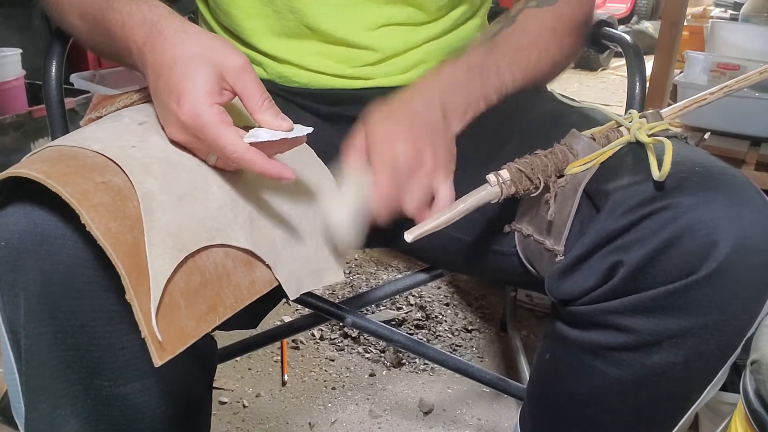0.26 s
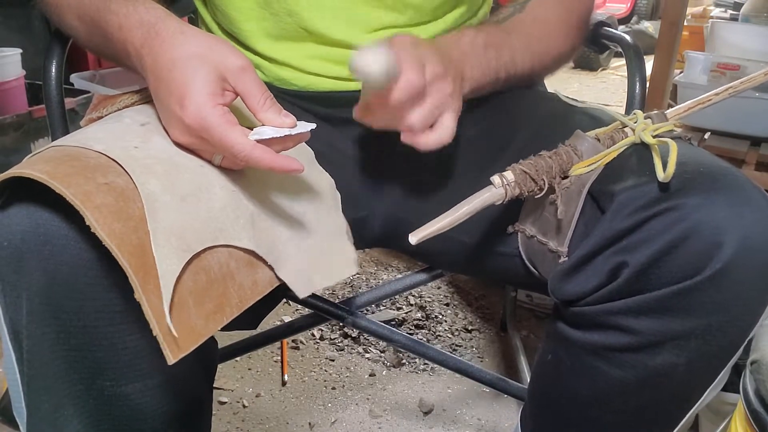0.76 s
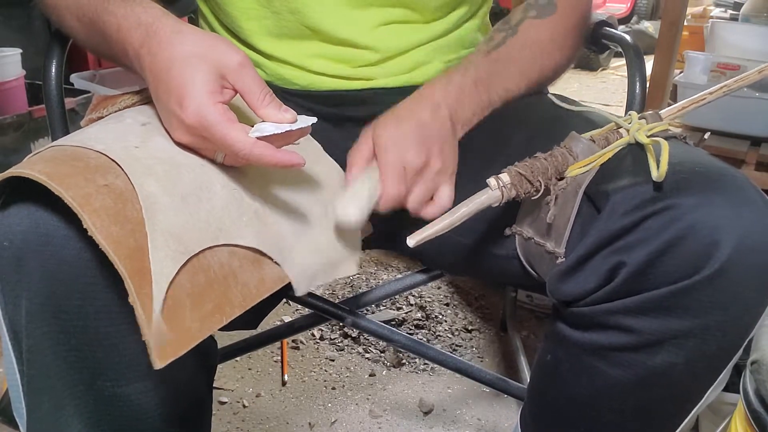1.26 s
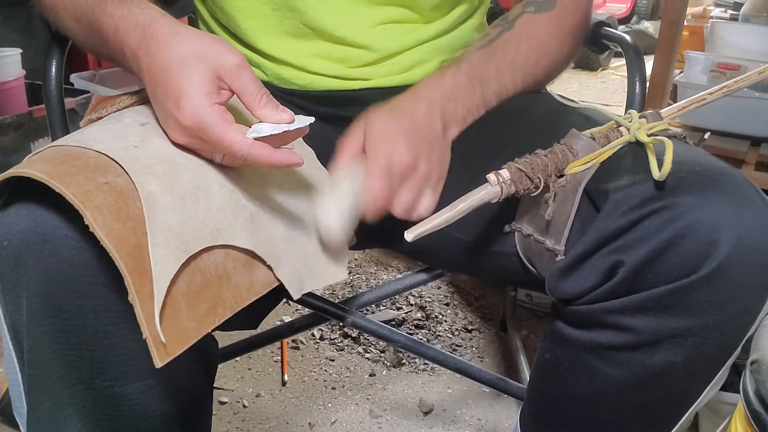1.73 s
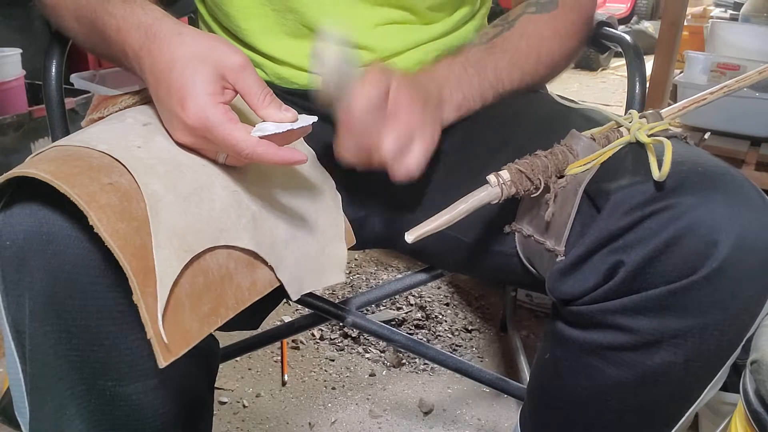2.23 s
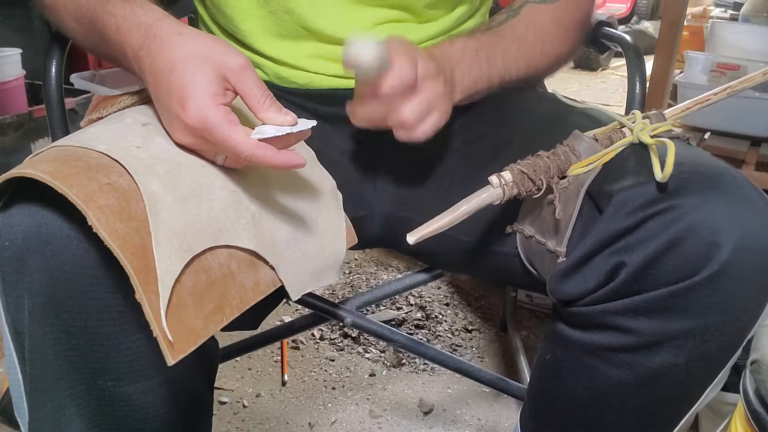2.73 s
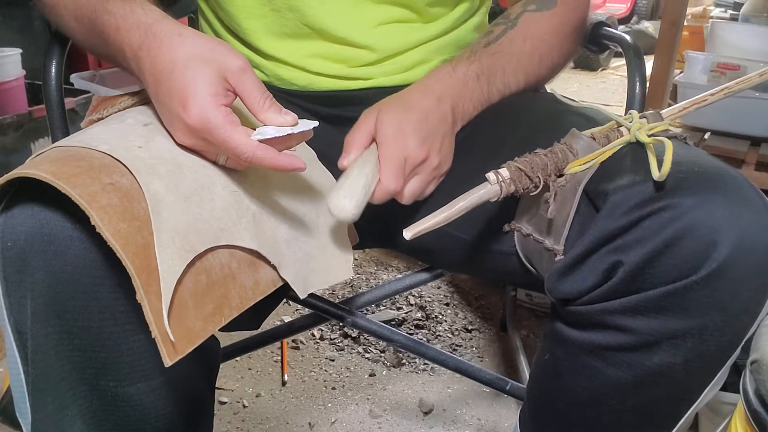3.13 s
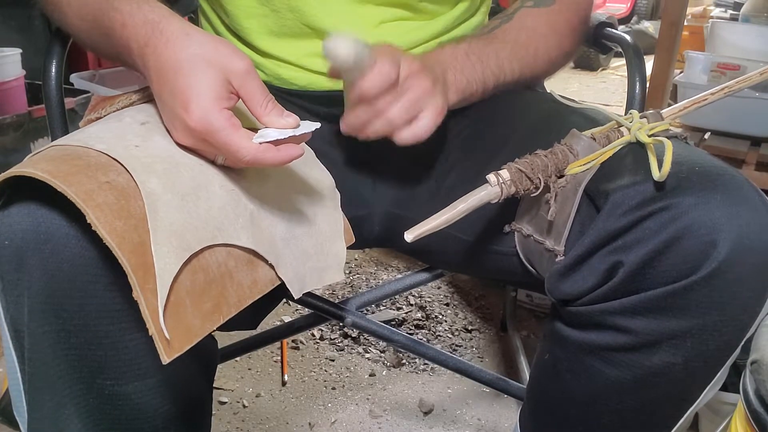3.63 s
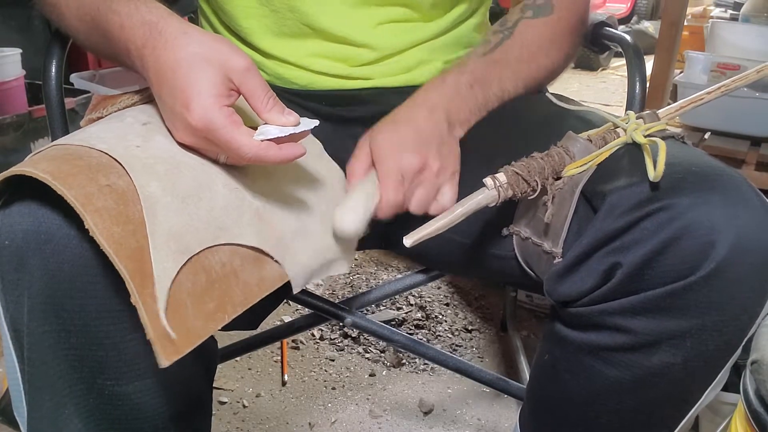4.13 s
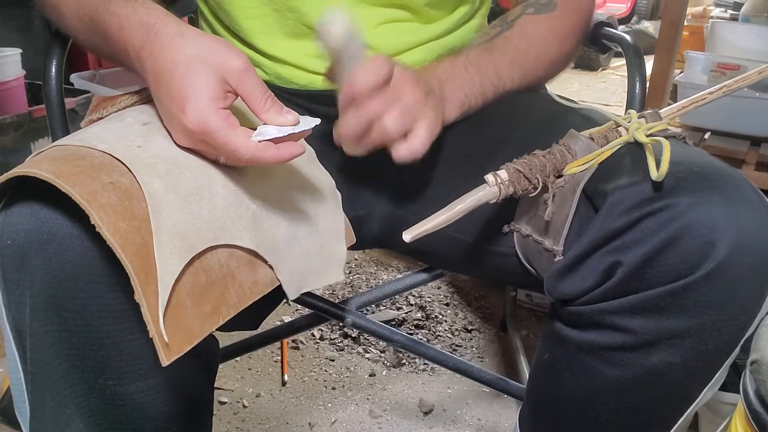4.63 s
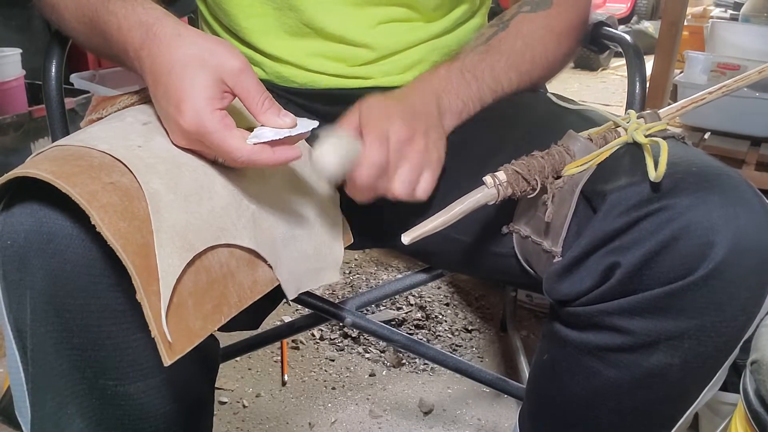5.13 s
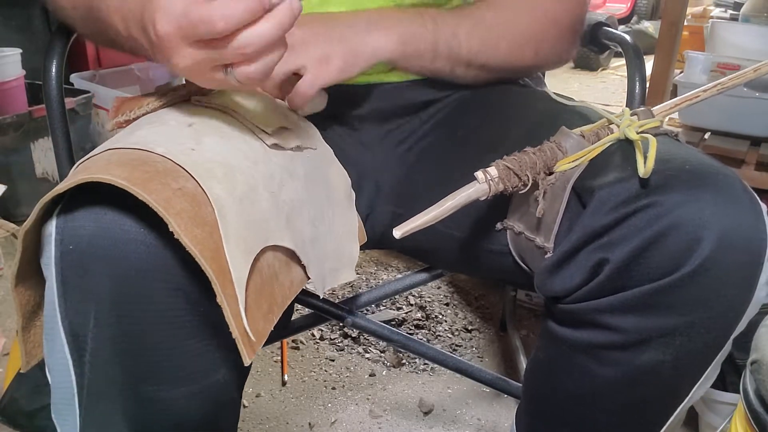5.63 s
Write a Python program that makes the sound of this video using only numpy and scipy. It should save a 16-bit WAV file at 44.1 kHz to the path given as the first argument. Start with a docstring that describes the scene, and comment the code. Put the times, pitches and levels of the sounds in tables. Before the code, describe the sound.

Small stone struck with a handheld hammerstone, heard near and louder at the left. Each hit is a high, short, ringing clack with a gritty contact click, close reflections and a brief room tail. Strikes vary in brightness and force, in two runs split by a pause. Underneath are a steady soft fan and faint low hum. The end is only room tone and a tiny brush of movement.

```python
"""Stone tapped in a workshop

A stone is tapped in mostly even runs, heard by two microphones and stronger at the left one.
Each tap rings three short modes and a contact click; close echoes, scatter and a fading room follow.
Fan noise, mains hum and a low drone fill the pauses; dull thuds and one faint rustle join in."""
import sys
import numpy as np
from scipy import signal
from scipy.fft import rfft, irfft
from scipy.io import wavfile
from scipy.ndimage import uniform_filter1d

SR = 44100
rng = np.random.default_rng(int(sys.argv[2]) if len(sys.argv) > 2 else 0)


def pcm_store(signal):
    """Save signal as 16-bit PCM."""
    levels = np.round(np.clip(np.atleast_2d(signal), -1, 1) * 32767)
    wavfile.write(sys.argv[1], SR, levels.astype(np.int16).T)


N = 258867


def gain_of(db):
    """Decibels to amplitude gain."""
    return 10 ** (np.asarray(db) / 20)


def read(points, hz):
    """Interpolates a table on a log-frequency axis."""
    f, value = np.transpose(points)
    return np.interp(np.log(hz + 1), np.log(f + 1), value)


def ring(x, hz, width_hz):
    """Two-pole resonance with gain 1 at its centre; a wider one dies sooner."""
    radius, turn = np.exp(-np.pi * width_hz / SR), np.exp(2j * np.pi * hz / SR)
    poles = np.poly([radius * turn, radius / turn]).real
    return abs(np.polyval(poles, turn)) * signal.lfilter([1], poles, x)


def band(x, hz, width_hz):
    """Band-pass around hz."""
    edges = [hz - width_hz / 2, min(hz + width_hz / 2, SR / 2 - 1)]
    return signal.sosfilt(signal.butter(2, edges, "band", fs=SR, output="sos"), x)


def peaked(x):
    """Scales to peak 1."""
    return x / abs(x).max()


def slow_noise(shape, smooth_samples):
    """Slow random wander of about unit spread: a moving average of noise."""
    return uniform_filter1d(rng.standard_normal(shape), smooth_samples) * np.sqrt(smooth_samples)


def fan():
    """Steady noise with narrow bumps, partly alike and delayed at the right microphone."""
    # left spectrum: pitch_hz, level_db per Hz
    floor = [(20, -91), (45, -72), (110, -75), (160, -80.5), (400, -80.5), (600, -77.5), (720, -85),
             (1200, -83), (2200, -89.5), (4000, -94.5), (6600, -101), (7500, -111), (9800, -109),
             (10600, -122), (15600, -127), (15900, -150)]
    # bumps: pitch_hz, width_hz, level_db
    bumps = [(116.3, 15.4, -62), (467, 43, -60), (874, 66, -56), (980, 42, -56.5), (1670, 28.6, -93.5),
             (2707, 71, -66), (3780, 250, -65)]
    # level difference: pitch_hz, left_minus_right_db
    left_excess = [(60, 2), (200, 0.5), (380, 3), (700, 5.5), (1290, 5.5), (2380, 6.5), (4400, 9.5),
                   (8100, 12), (10000, 7), (12000, -4.5), (15000, 10.5)]
    # likeness of the two sides: pitch_hz, likeness (0 to 1)
    likeness = [(30, .995), (120, .97), (250, .87), (700, .8), (1000, .92), (2000, .75), (5000, .7),
                (10000, .5), (14000, .1)]
    lag_ms = 0.43
    hz = np.fft.rfftfreq(N, 1 / SR)
    power = gain_of(read(floor, hz)) ** 2
    for f, width_hz, db in bumps:
        power = power + gain_of(db) ** 2 / width_hz * np.exp(-((hz - f) / width_hz * 2) ** 2)
    left, other = rfft(rng.standard_normal((2, N)), axis=1)
    same = np.clip(read(likeness, hz), 0, 1)
    delayed = left * np.exp(-2j * np.pi * hz * lag_ms / 1000)
    right = same * delayed + np.sqrt(1 - same ** 2) * other
    both = np.array([left, right / gain_of(read(left_excess, hz))])
    return irfft(both * np.sqrt(power * SR / 2), N, axis=1)


def hum():
    """Mains overtones: sines whose levels waver slowly."""
    # overtones: pitch_hz, level_db (rms, before the waver)
    overtones = [(240.5, -65), (360.7, -67.5)]
    waver_db = 2.6  # spread
    t = np.arange(N) / SR
    out = np.zeros(N)
    for (hz, db), waver in zip(overtones, slow_noise((len(overtones), N), 3000)):
        out += gain_of(db + waver_db * waver) * np.sin(2 * np.pi * hz * t)
    return np.sqrt(2) * out


def drone():
    """Low sine of changing level whose wavering pitch settles lower, then holds around there."""
    # level curve: time_s, level_db (rms)
    levels = [(0.0, -63), (0.19, -55.5), (0.93, -47), (0.96, -57), (1.99, -53.5), (2.03, -70),
              (2.47, -47.5), (2.73, -62), (2.84, -55), (2.96, -67), (3.02, -59), (3.32, -54), (4.2, -66.5),
              (4.69, -50), (5.77, -63), (5.87, -64)]
    # pitch curve before the waver: time_s, pitch_hz
    pitches = [(0, 65), (.54, 63.8), (.65, 58.6)]
    waver_hz = 0.75  # spread
    t = np.arange(N) / SR
    pitch_hz = np.interp(t, *np.transpose(pitches)) + waver_hz * slow_noise(N, 9000)
    level = gain_of(np.interp(t, *np.transpose(levels)))
    return np.sqrt(2) * level * np.sin(2 * np.pi * np.cumsum(pitch_hz) / SR)


def brushes():
    """Faint rustle: a soft wide-band puff of noise."""
    # puffs: centre_s, gain_db (before panning), length_s (centre to 1/e)
    puffs = [(5.65, -57.5, 0.021)]
    t = np.arange(N) / SR
    noise = band(rng.standard_normal((2, N)), 5400, 6900)
    return noise * sum(gain_of(db) * np.exp(-((t - s) / length_s) ** 2) for s, db, length_s in puffs)


def thuds():
    """Soft dull bumps under and after some taps: a few cycles of a damped low sine."""
    # bumps: start_s, gain_db (before panning), pitch_hz
    bumps = [(.326, -50, 484), (.341, -42, 760), (.35, -38, 930), (.37, -42, 610), (.645, -38.5, 413),
             (1.258, -43, 397), (1.522, -38, 338), (2.6, -39, 600), (2.625, -44, 500), (2.906, -50, 505),
             (3.829, -41, 670), (4.715, -46, 605), (4.948, -44, 614)]
    out, t = np.zeros(N), np.arange(2000) / SR
    envelope = t / 0.0024 * np.exp(1 - t / 0.0021)
    for s, db, hz in bumps:
        start = round(s * SR)
        out[start:start + len(t)] += gain_of(db) * np.sin(2 * np.pi * hz * t) * envelope
    return out


def late_room(noise):
    """Late room sound: noise builds up, then dies band by band; left and right levels set."""
    # decay: pitch_hz, t60_s
    decay = [(1200, 0.23), (3700, 0.28), (6500, 0.31), (9600, 0.23), (14000, 0.27)]
    level_db, build_up_s = (-4.5, -8.5), 0.048
    size = noise.shape[1]
    hz, t, grid = signal.stft(noise, SR, nperseg=128)
    fade = gain_of(-60 * t / read(decay, hz)[:, None])
    tail = signal.istft(grid * fade, SR, nperseg=128)[1][:, :size]
    tail = tail * (1 - np.exp(-np.arange(size) / SR / build_up_s))
    return gain_of(level_db)[:, None] * tail / np.linalg.norm(tail, axis=1, keepdims=True)


def early_scatter(noise):
    """Dense early reflections: decaying noise after a short ramp; left and right levels set."""
    level_db, t60_s, build_up_s = (8.5, -4), 0.1, 0.0018
    t = np.arange(noise.shape[1]) / SR
    scatter = noise * gain_of(-60 * t / t60_s) * np.minimum(t / build_up_s, 1)
    return gain_of(level_db)[:, None] * scatter / np.linalg.norm(scatter, axis=1, keepdims=True)


def close_echoes(size):
    """Echoes off nearby things at exact delays, then weaker ones of chance sign."""
    # left echoes: delay_ms, strength (signed)
    left_echoes = [(0.0, 0.56), (0.658, 1.0), (0.907, 1.0), (1.361, -0.55), (1.837, -0.83), (2.472, -0.67),
                   (3.129, -0.48), (4.036, -0.47), (6.1, 0.55), (6.803, -0.62), (7.664, -0.73)]
    # right echoes: delay_ms, strength (signed)
    right_echoes = [(0.272, -0.24), (0.658, -0.99), (1.905, 0.76), (2.222, 0.38), (3.129, -0.35),
                    (5.351, 0.35), (7.052, -0.24), (8.662, 0.23), (9.569, -0.3)]
    step_ms, later_db = 1.6, (-19, -22)  # levels left, right
    later_ms = np.arange(10.5, 26, step_ms)
    at = np.arange(-20, size - 20)  # room for the sinc to start before delay 0
    sides = []
    for near, db in zip((left_echoes, right_echoes), later_db):
        place, sign = rng.random((2, len(later_ms)))
        far = list(zip(later_ms + step_ms * place, gain_of(db) * np.sign(sign - .5)))
        sides.append(sum(g * np.sinc(at - ms * SR / 1000) for ms, g in near + far))
    return np.array(sides)


def click_part(low_db, high_db, grit_db):
    """The high ring, and the contact itself: a low knock and a crunch in two treble bands."""
    detune = .006  # spread, share of the pitch
    click = signal.unit_impulse(1024)
    high_hz = 9517 * (1 + detune * rng.standard_normal())
    high = band(ring(click, high_hz, 420), high_hz, 4360)
    knock = band(band(click, 1280, 330), 1280, 330)
    # grains break a moment after contact
    grit_lag, edge_lag = rng.integers(8, 40, size=2)
    grit = band(np.roll(click, grit_lag), 6200, 3400)
    edge = band(np.roll(click, edge_lag), 13200, 5600)
    parts = [(low_db - 15.5, knock), (grit_db, grit), (high_db, high), (high_db - 18, edge)]
    return sum(gain_of(db) * part / np.linalg.norm(part) for db, part in parts)


def taps():
    """Strikes ring the stone through fixed echoes, with a scatter and room partly new each time."""
    # strikes: start_s, low_ring_db, middle_ring_db, high_ring_db, grit_db,
    # damping (factor on the low ring's width, from the grip), low_ring_hz
    strikes = [(0.0607, -31, -38, -18.5, -24, 0.98, 3700), (0.1096, -32, -59, -22.5, -38, 0.86, 3670),
               (0.3244, -16, -24.5, -1, -13.5, 1.17, 3770), (0.6442, -7, -33, 3, -22.5, 2.9, 3820),
               (0.6506, -11, -39, -8.5, -8.5, 2.7, 3540), (0.7223, -31, -57, -40, -40, 5.9, 3330),
               (0.9643, -8, -15.5, 3.5, -5, 0.57, 3813), (1.2567, -9.5, -19, -7, -57, 1.8, 3780),
               (1.5204, -8, -63, -9.5, -23, 1.02, 3690), (1.7796, -13, -43, -20, -23.5, 1.7, 3610),
               (2.0324, -9.5, -15, -15.5, -10.5, 0.61, 3730), (2.3056, -8.5, -17, -7, -6.5, 0.56, 3720),
               (2.597, -7.5, -15.5, -12, -28.5, 1.03, 3675), (2.904, -10.5, -15, -2.5, -5.5, 0.39, 3690),
               (3.5727, -20, -28, -26.5, -24.5, 1.36, 3700), (3.8271, -11.5, -17.5, 2.5, -9.5, 1.95, 3680),
               (4.124, -8, -16, -4, -7.5, 0.69, 3720), (4.4215, -8.5, -13, -9.5, -8.5, 0.78, 3666),
               (4.7127, -7, -43.5, -4.5, -19, 0.72, 3667), (4.9471, -13, -39, -13.5, -27, 2.5, 3570),
               (5.1675, -12.5, -19.5, -14.5, -15, 1.34, 3616)]
    moved = 0.53  # amplitude share of scatter and room noise that is new each tap, as the hands move
    low_width_hz, linger_width_hz, linger_db = 260, 150, -9  # low width at damping 1
    middle_hz, middle_width_hz, middle_room_db = 4640, 235, -7.5
    soft_hz = 4540  # the blow is too long to drive the low ring far above its pitch
    treble_t60_s = 0.097  # soft surroundings swallow the treble of later echoes
    treble_room_db, left_minus_right_db = 1.5, -1.14
    size, out, click = SR // 2, np.zeros((2, N + SR)), signal.unit_impulse(1024)
    t = np.arange(size) / SR
    echoes, steady = close_echoes(size), rng.standard_normal((2, size))
    dulled = echoes * gain_of(-60 * t / treble_t60_s)
    blow = signal.sosfilt(signal.butter(2, soft_hz, fs=SR, output="sos"), click)
    middle = peaked(band(ring(click, middle_hz, middle_width_hz), middle_hz, 1200))
    balance = gain_of([[left_minus_right_db / 2], [-left_minus_right_db / 2]])
    for s, low_db, middle_db, high_db, grit_db, damping, low_hz in strikes:
        noise = np.sqrt(1 - moved ** 2) * steady + moved * rng.standard_normal((2, size))
        scatter = early_scatter(noise)
        room = late_room(noise[:, ::-1])
        # a small stone gives no bass
        low = gain_of(low_db) * peaked(band(ring(blow, low_hz, low_width_hz * damping), 4080, 5280))
        # a core of the low ring lasts into the room
        linger = gain_of(low_db + linger_db) / damping * peaked(ring(click, low_hz, linger_width_hz))
        # the click's room share has its own level
        click_path = dulled + gain_of(treble_room_db) * room + scatter
        # the middle mode beams at the microphones, so less of it reaches the room
        middle_path = echoes + gain_of(middle_room_db) * room
        paths = [(low, echoes + room + scatter),
                 (click_part(low_db, high_db, grit_db), click_path),
                 (linger, room),
                 (gain_of(middle_db) * middle, middle_path)]
        heard = sum(signal.fftconvolve(part[None], path, axes=1) for part, path in paths)
        start = round((s - .001) * SR)  # placed 1 ms early; delay 0 of the echoes falls 20 samples later, so a tap sounds about 0.55 ms before start_s
        out[:, start:start + heard.shape[1]] += heard * balance
    return out[:, :N]


def scene():
    """Taps over fan, hum and drone; thuds and rustle lean 5 dB to the left."""
    leaning = (thuds() + brushes()) * gain_of([[2.5], [-2.5]])
    return fan() + hum() + drone() + leaning + taps()


def record(dry):
    """Clips peaks at a ceiling, then low-passes at the band limit."""
    held = np.clip(dry, -.89, .89)
    low_pass = signal.firwin(511, 16850, window=("kaiser", 9), fs=SR)  # cutoff in Hz
    return signal.oaconvolve(held, low_pass[None], "same")


dry = scene()
out = record(dry)
pcm_store(out)
```